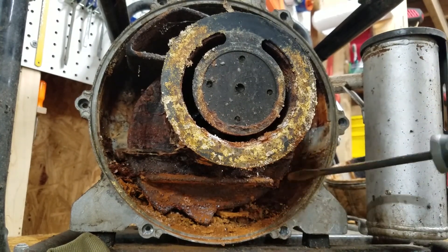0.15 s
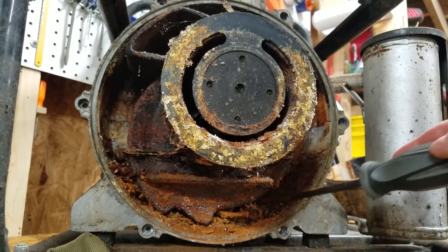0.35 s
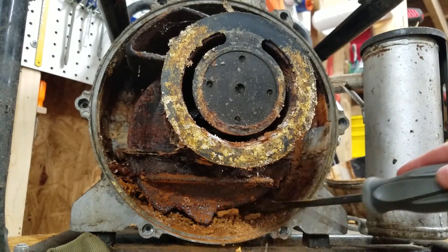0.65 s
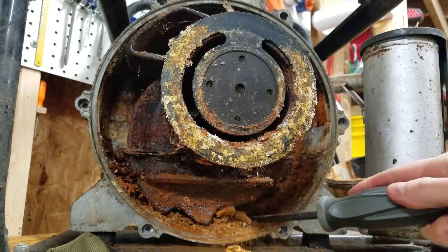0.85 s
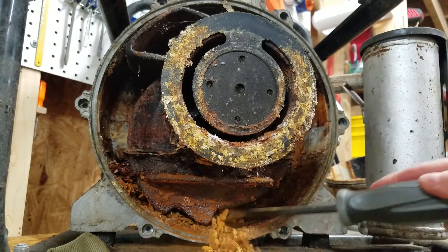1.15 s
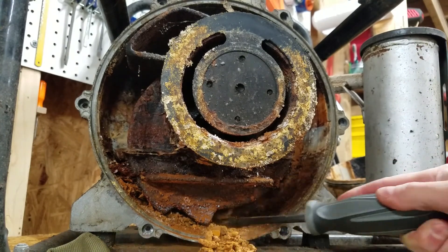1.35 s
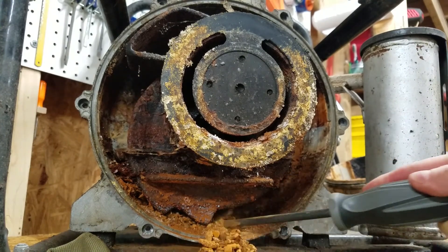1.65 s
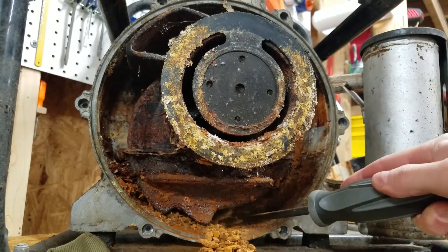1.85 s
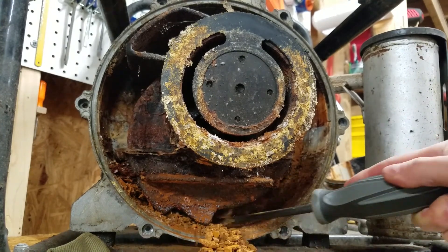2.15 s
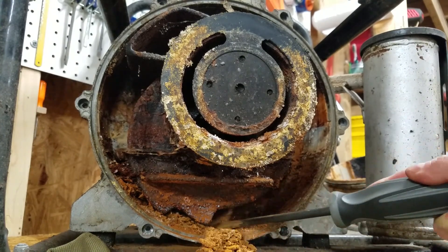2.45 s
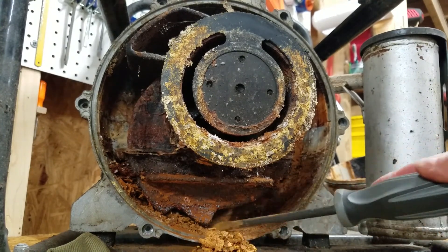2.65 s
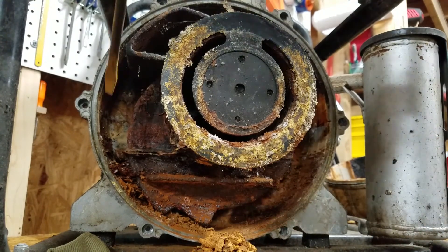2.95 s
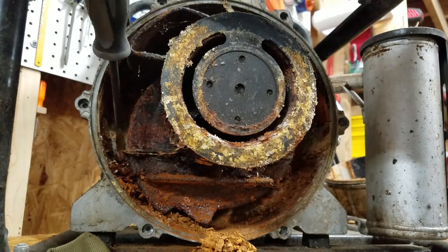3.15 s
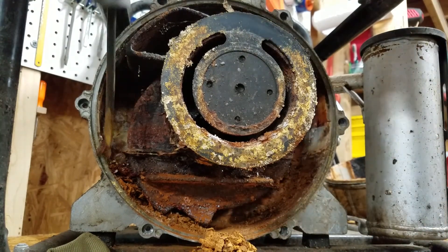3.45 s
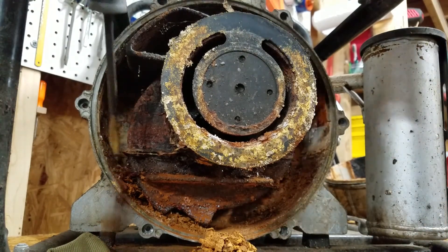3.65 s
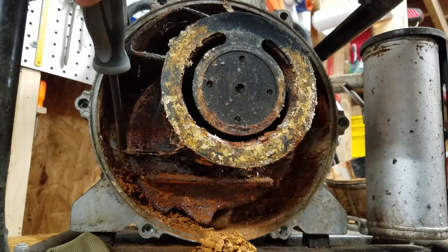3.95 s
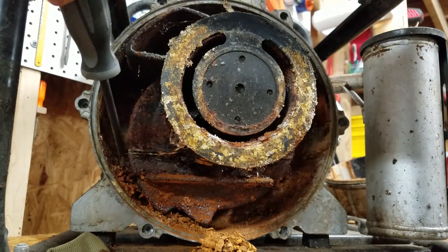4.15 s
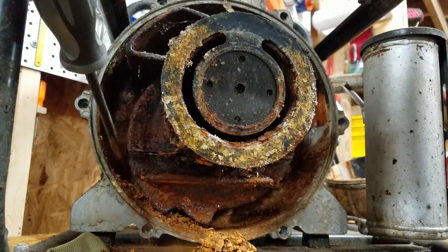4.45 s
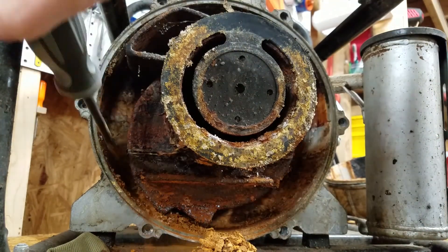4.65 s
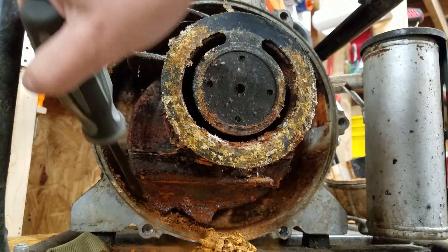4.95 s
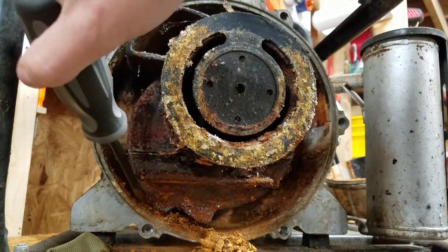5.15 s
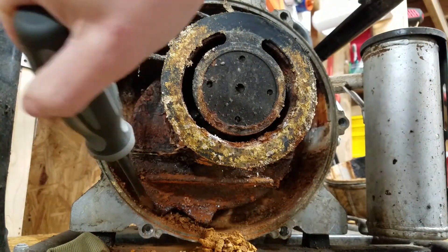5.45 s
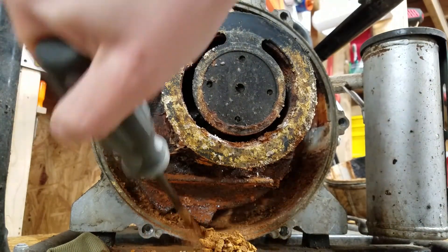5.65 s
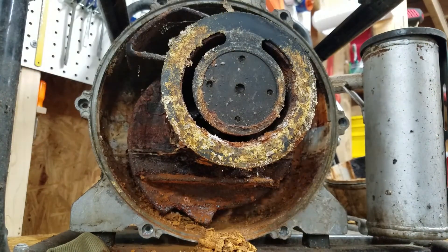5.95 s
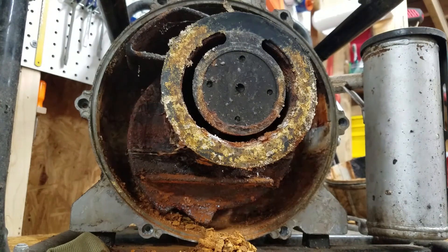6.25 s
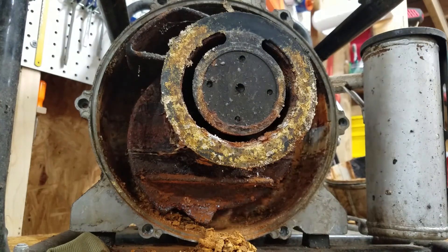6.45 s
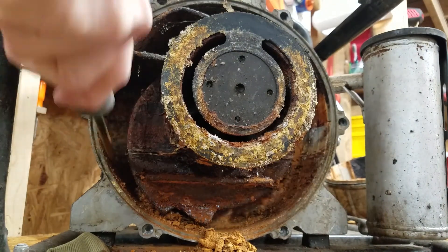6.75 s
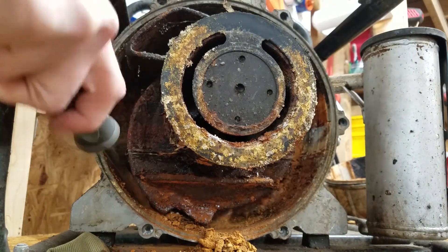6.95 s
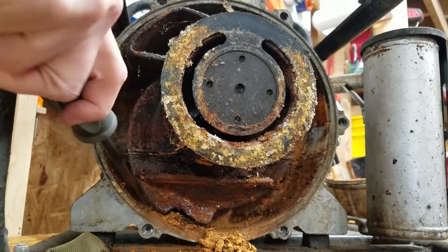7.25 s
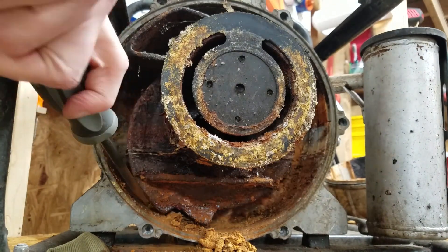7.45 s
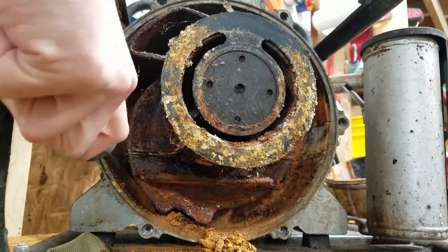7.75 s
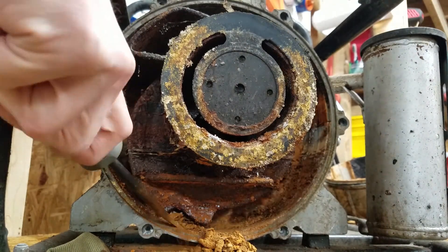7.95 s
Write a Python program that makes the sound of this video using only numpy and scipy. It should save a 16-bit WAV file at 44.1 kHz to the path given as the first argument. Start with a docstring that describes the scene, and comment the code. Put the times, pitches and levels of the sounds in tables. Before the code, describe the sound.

Close, bright metallic clinks and short crumbly scrapes of a tool in a rusty pump housing, with a few hollow knocks after six seconds.

```python
"""A screwdriver chips and scrapes rust out of an open cast-metal pump housing, close to a phone in a small workshop.
Faint steady hiss and a low rumble lie underneath from the start, where a soft thump and two hollow knocks come first.
From 0.2 s jabs ring the housing near 2.9 kHz, hardest in the first three seconds; between them the tip is dragged:
dense tiny slips ring the housing too, rasp the shaft and crush flakes. Around 6 s the scraping pauses and thumps and
knocks come as the tool is moved about; then strokes and a few jabs go on to the end. Noise and decaying tones make it."""
import sys
import numpy as np
from scipy import signal
from scipy.fft import rfft, irfft, next_fast_len
from scipy.io import wavfile

SR = 44100
rng = np.random.default_rng(int(sys.argv[2]) if len(sys.argv) > 2 else 0)


def unload_wav(signal):
    """Save mono or channel-first audio to the path in sys.argv[1] as 16-bit WAV at rate SR, clipped to [-1, 1]."""
    wavfile.write(
        sys.argv[1],
        SR,
        np.round(np.clip(np.atleast_2d(signal).T, -1, 1) * 32767).astype(np.int16),
    )


N = 357651  # samples in the scene
RESPONSE = 13230  # samples in one ring or burst (0.3 s)
AGE = np.arange(RESPONSE) / SR  # seconds since contact


def undb(db):
    """Turn decibels into gain."""
    return 10 ** (np.asarray(db) / 20)


def level(x, db):
    """Scale to an rms level in dB."""
    return x * undb(db) / np.sqrt(np.mean(x ** 2) + 1e-20)


def unit(x):
    """Scale to unit energy."""
    return x / np.sqrt(np.sum(x ** 2) + 1e-20)


def add(out, start_s, x):
    """Mix a sound in at a time, cutting what runs past the end."""
    i = max(int(start_s * SR), 0)
    out[i:i + len(x)] += x[:max(N - i, 0)]


def conv(x, response):
    """Filter by an impulse response, keeping the length."""
    return signal.fftconvolve(x, response)[:len(x)]


def fade(t60):
    """Die away exponentially, by 60 dB in t60 seconds."""
    return np.exp(-np.log(1000) * AGE / t60)


def spectrum_gain(points, size):
    """Draw a smooth gain curve through (pitch_hz, level_db) points, on a log pitch scale."""
    pitch_hz, level_db = np.transpose(points)
    bins = np.maximum(np.fft.rfftfreq(size, 1 / SR), 1)
    return undb(np.interp(np.log(bins), np.log(pitch_hz), level_db))


def colour(points, size=2048):
    """Make a short filter with the given spectrum, with its energy as early as possible (minimum phase)."""
    cepstrum = irfft(np.log(spectrum_gain(points, size)))
    # fold the backward half of the cepstrum onto the forward half
    cepstrum[1:size // 2] *= 2
    cepstrum[size // 2 + 1:] = 0
    return irfft(np.exp(rfft(cepstrum)))


def band(x, lo_hz, hi_hz, order=1):
    """Keep the pitches between two limits (Butterworth band-pass)."""
    limits = [max(lo_hz, 20), min(hi_hz, SR / 2 - 1)]
    return signal.sosfilt(signal.butter(order, limits, "band", fs=SR, output="sos"), x)


def ring(modes, scatter_db, detune):
    """Sum decaying tones; each contact changes their levels and pitches a little at random."""
    chance = rng.standard_normal((len(modes), 2))
    total = np.zeros(RESPONSE)
    for (pitch_hz, level_db, t60), (loudness, bend) in zip(modes, chance):
        tone = np.sin(2 * np.pi * pitch_hz * (1 + detune * bend) * AGE)
        total += undb(level_db + scatter_db * loudness) * fade(t60) * tone
    return total


def burst(response, t60, tail_db, tail_t60):
    """A short crunch of noise with a weaker or longer tail, in a given colour."""
    envelope = fade(t60) + undb(tail_db) * fade(tail_t60)
    return unit(conv(rng.standard_normal(RESPONSE) * envelope, response))


# shape of the hiss and of the rumble: pitch_hz, level_db (relative)
HISS_COLOUR = [(200, -18.5), (600, -6.5), (1000, -3.5), (1500, -0.5), (2200, -6), (4000, -9.5),
               (5500, -9.5), (8000, -6), (10200, -12), (15900, -10)]
RUMBLE_COLOUR = [(25, -13), (50, -9.5), (100, -8.5), (160, -3.5), (300, 2.5), (450, -1), (700, -4),
                 (1200, -21.5)]
# how the rumble comes and goes: time_s, gain_db
RUMBLE_SWELL = [(0, -60), (.3, -68), (.7, -74), (.95, -56.5), (2.8, -59.5), (4.498, -57.5), (6.15, -58.5),
                (6.4, -68), (7.0, -70), (7.75, -72.5), (7.9, -57), (8.11, -61)]
HISS_DB = -66  # rms


def floor():
    """Steady noise hiss, brighter in the left port, and low noise rumble that comes and goes, partly shared."""
    noise = rng.standard_normal((7, N))
    hiss = [level(conv(noise[k] + 0.09 * noise[2], colour(HISS_COLOUR)), HISS_DB) for k in (0, 1)]
    hiss[0] = hiss[0] + level(band(noise[3], 11400, 13400, order=2), -69.5)
    # the swell is applied on top of this rms level
    rumble = [level(conv(noise[4] + .7 * own, colour(RUMBLE_COLOUR)), -10.5) for own in noise[5:]]
    swell = undb(np.interp(np.arange(N) / SR, *np.transpose(RUMBLE_SWELL)))
    return np.array(hiss) + swell * np.array(rumble)


# soft thumps on the housing: start_s, level_db (peak before the gain of each port)
THUMPS = [(.005, -59.5), (4.274, -58), (6.162, -38.5), (6.186, -40)]
# tones in a thump: pitch_hz, level_db (relative), t60_s
THUMP_MODES = [(75, -25, .27), (140, -25, .2), (305, 0, .19), (302, -24, .7), (393, -19, .12),
               (554, -19, .16)]
THUMP_ATTACK_S = 0.0081  # a soft bump builds up over a few cycles


def thumps():
    """Soft bumps wake only the lowest tones of the housing, with a gentle start."""
    out = np.zeros(N)
    for start_s, level_db in THUMPS:
        boom = ring(THUMP_MODES, scatter_db=1.5, detune=0.0033)
        boom = boom * (1 - np.exp(-AGE / THUMP_ATTACK_S))
        add(out, start_s, boom * undb(level_db) / np.abs(boom).max())
    return out


# hollow knocks: start_s, level_db (the hollow part peaks 1.5 dB higher),
# treble_db (clack against the hollow part, before a 7.5 dB lift)
KNOCKS = [(.044, -50, -9), (0.125, -54, -8), (3.596, -44.5, -3), (4.746, -44.5, -21), (5.85, -57, -9),
          (5.932, -58, -13), (6.021, -54.5, -7), (6.04, -51.5, -14), (6.15, -45, -16.5),
          (6.168, -39.5, -13.5), (6.204, -41.5, -18), (6.581, -41.5, -8), (6.625, -22.5, -11),
          (6.646, -36.5, 0), (6.872, -33.5, -9), (7.602, -39.5, -9.5), (7.725, -42.5, -8.5)]
# tones of the hollow body: pitch_hz, level_db (relative, before a band-pass), t60_s
HOLLOW_MODES = [(429, 1, 0.33), (871, 3, .13), (1100, -3.5, 0.088), (1143, -10, 0.18), (1327, 7, .07),
                (1390, 6.5, 0.032), (1670, -8, 0.11), (1940, -20, 0.054)]
# how much the hollow body rings, by knock strength; the hardest rings most:
# level_db (as in the knocks), ring_db (against the clunk)
KNOCK_RING = [(-41, -1), (-36.5, -5), (-22.5, 8.5)]
# shape of the hard clack and of the dull clunk: pitch_hz, level_db (relative)
CLACK_COLOUR = [(200, -49), (1500, -66), (2300, 0.5), (2850, 23), (3500, 16), (4200, 12.5), (5100, 7.5),
                (6100, 13.5), (7600, 2.5), (9000, -4), (11300, -7), (16000, -25)]
CLUNK_COLOUR = [(60, -19), (250, -18), (470, -0.5), (650, -9), (900, 2), (1200, -8), (1600, 6), (2100, 0),
                (3000, -11.5), (6000, -18)]


def knocks():
    """A dull noise clunk with a hard clack on top; the hollow body's tones ring along, most in a firm knock."""
    out, clack, clunk = np.zeros(N), colour(CLACK_COLOUR), colour(CLUNK_COLOUR)
    for start_s, level_db, treble_db in KNOCKS:
        ring_db = np.interp(level_db, *np.transpose(KNOCK_RING))
        # one click plus a rough tail of noise sets the tones going
        rough = unit(rng.standard_normal(RESPONSE) * fade(0.063))
        contact = unit(signal.unit_impulse(RESPONSE) + 0.62 * rough)
        tones = conv(ring(HOLLOW_MODES, scatter_db=0.5, detune=0.0019), contact)
        tones = unit(band(tones, 940, 1430, order=2))
        thud = burst(clunk, t60=0.053, tail_db=-4, tail_t60=0.15)
        hollow = unit(thud + undb(ring_db) * tones)
        treble = burst(clack, t60=0.043, tail_db=-15.5, tail_t60=0.22)
        hit = hollow + undb(treble_db + 7.5) * treble
        add(out, start_s, hit * undb(level_db + 1.5) / np.abs(hollow).max())
    return out


# tones of the housing wall, before shift and band-pass: pitch_hz, level_db (relative), t60_s
HOUSING_MODES = [(2458, -12, .053), (2830, -3.5, 0.085), (2909, 6.5, 0.021), (2944, 1, .027),
                 (3160, -6, .023), (3108, -10, 0.0075), (3420, -9.5, 0.043), (3780, -5, 0.03),
                 (4105, -13.5, 0.038), (4430, -20, 0.028)]
CONTACT_SHIFT = .014  # typical pitch shift from one point of contact to another, as a share of the pitch


def housing():
    """The wall's ring: decaying tones that shift with the point of contact, with a random upper limit."""
    reach_hz = 3900 + 650 * rng.uniform(-1, 1)
    shift = 1 + CONTACT_SHIFT * rng.standard_normal()
    modes = [(pitch_hz * shift, level_db, t60) for pitch_hz, level_db, t60 in HOUSING_MODES]
    return unit(band(ring(modes, scatter_db=2.6, detune=.008), 2650 * shift, reach_hz, order=2))


# the shaft's resonance follows the grip and the angle of the tip: time_s, centre_hz, width_hz (first filter)
SHAFT_RESONANCE = [(0, 5560, 4040), (1.9, 8930, 3620), (2.3, 8500, 1830), (2.65, 7640, 1710),
                   (3.1, 6720, 900), (5.65, 6440, 549), (6.7, 7400, 3500)]


def shaft(time_s):
    """The hand-damped resonance of the screwdriver at this moment: a click through two band-passes."""
    times, centres, widths = np.transpose(SHAFT_RESONANCE)
    centre_hz = np.interp(time_s, times, centres)
    width_hz = np.interp(time_s, times, widths)
    peak = band(signal.unit_impulse(RESPONSE), centre_hz - width_hz / 2, centre_hz + width_hz / 2)
    return unit(band(peak, centre_hz - 1.4 * width_hz, centre_hz + 0.396 * width_hz))


# in the first second the hollow sounds thin, without its lows; later they fill in:
# time_s, lowest_hz, gain_db
HOLLOW_LOWS = [(.3, 1400, 9), (.8, 950, 1), (1.3, 355, 1), (1.9, 300, 0.5), (3.1, 250, -3.5)]
# the more crust a jab breaks, the more the hollow behind the wall answers:
# crack of a clean jab (dB), its hollow body (dB), rise (dB per dB of crack), where the rise stops (dB of crack)
CLEAN_CRACK_DB, BODY_DB, BODY_SLOPE, BODY_RANGE_DB = -29, -23.5, 0.47, 12.5


def jab(start_s, level_db, crack_db, crack, body):
    """One jab cracks the crust in a noise burst, and rings the wall, the shaft and the hollow behind."""
    snap = burst(crack, t60=0.0095, tail_db=-12.0, tail_t60=0.11)
    rasp = burst(shaft(start_s), t60=0.0094, tail_db=-19.5, tail_t60=0.07)
    # with the tool held upright against the left wall, the shaft speaks more than the crust
    shaft_db = np.interp(start_s, [1.9, 3.2, 5.7, 6.2], [-4, 2, 17.0, 1.5])
    bright = unit(snap + undb(shaft_db) * rasp)
    times, lows, gains = np.transpose(HOLLOW_LOWS)
    hollow = burst(body, t60=0.022, tail_db=5.5, tail_t60=0.077)
    hollow = band(hollow, np.interp(start_s, times, lows), 6025, order=2)
    hollow = undb(np.interp(start_s, times, gains)) * hollow
    body_db = BODY_DB + BODY_SLOPE * min(crack_db - CLEAN_CRACK_DB, BODY_RANGE_DB)
    hit = housing() + undb(crack_db + 11.0) * bright + undb(body_db) * hollow
    return hit * undb(level_db + 4.5) / np.abs(hit).max()


# the tip strikes the wall or snaps a flake: start_s, level_db (peaks 4.5 dB higher),
# crack_db (bright crack against the wall's ring, before an 11 dB lift)
TAPS = [(0.2042, -27, -14), (0.2831, -29, -15), (.6651, -22, -15), (.8258, -19, -21), (0.9679, -12, -29),
        (1.167, -31.5, 14), (1.2006, -15.5, -28.5), (1.215, -14.5, -29.5), (1.2203, -21, -38),
        (1.2347, -28, 2.5), (1.321, -11.5, -25), (1.3503, -25, -21.5), (1.469, -13, -24),
        (1.6205, -14.5, -22.5), (1.644, -29.5, -14), (1.703, -33.5, 11), (1.718, -11, -19.5),
        (1.731, -17.5, -25), (1.777, -23, -16), (1.8254, -17.5, -35), (1.8469, -19.5, -26),
        (1.94, -19, -34), (1.956, -29, -19), (2.161, -25.5, -23), (2.1794, -26, -16.5), (2.28, -21, -17.5),
        (2.45, -24.5, -44), (2.473, -28, -24), (2.5423, -30.5, -25), (2.6431, -23.5, -29),
        (3.0557, -10, -24), (3.1128, -34, -2), (3.142, -31, -31), (3.3784, -25, -24), (3.4035, -28, -38),
        (3.456, -30, -19), (3.5315, -39.5, -20), (3.5596, -37.5, 8), (3.7286, -42, 14), (3.856, -41.5, 4),
        (4.1022, -35.5, -11), (4.268, -36.5, -6), (4.674, -48, -25), (4.7444, -37.5, -8),
        (4.9717, -43, -30), (5.076, -34.5, 16), (5.1488, -26.5, -22.5), (5.3023, -36.5, 1),
        (5.364, -38, -19), (5.464, -34, 10), (5.5048, -30.5, -3.5), (5.5888, -40.5, 1),
        (5.6346, -36.5, -25), (6.2034, -28.5, 11), (6.49, -42, 5), (6.8385, -35.5, -18),
        (7.382, -33.5, -19), (7.4928, -38.5, -22), (7.8067, -39, -18), (7.905, -30.5, -30)]
# shape of the crust's crack and of the hollow behind the wall: pitch_hz, level_db (relative)
CRACK_COLOUR = [(200, -55.5), (2200, -14), (3500, -2.5), (4300, 4.5), (5200, 1), (7000, -10), (8000, 1.5),
                (10500, -3), (12200, -2), (14000, -10.5), (15500, -2)]
BODY_COLOUR = [(60, -40.5), (200, -19.5), (400, -6.5), (560, -5.5), (700, -9.5), (1000, -3), (1350, -1.5),
               (1620, 4), (1950, -0.5), (2500, -13.5), (3500, -39.5)]
# each stroke breaks one flake loose: its level above the stroke's grit_db, and its crack_db, as in the taps
FLAKE_DB, FLAKE_CRACK_DB = 17, -1


def taps():
    """The jabs, and the flake that snaps off at a random point along each stroke, struck in the same way."""
    out, crack, body = np.zeros(N), colour(CRACK_COLOUR), colour(BODY_COLOUR)
    flakes = [(rng.uniform(start_s, end_s), grit_db + FLAKE_DB, FLAKE_CRACK_DB)
              for start_s, end_s, grit_db, _ in STROKES]
    for start_s, level_db, crack_db in TAPS + flakes:
        add(out, start_s, jab(start_s, level_db, crack_db, crack, body))
    return out


def slips(length, rate, spread_db, catch_rate, catch_db):
    """Tiny fractures of very unequal size; the tip catches and frees itself, so they come in clusters."""
    size = int(length * SR)
    t = np.arange(size) / SR
    chance = rng.random((RESPONSE, 2))[:size].T
    catches = np.interp(t * catch_rate, np.arange(256), rng.standard_normal(256))
    unequal = np.minimum(-np.log(1 - chance[1]), 4)
    sizes = undb(spread_db * unequal + catch_db * catches)
    swell = np.sin(np.pi * t / length) ** 0.2
    signs = rng.choice([-1, 1], RESPONSE)[:size]
    return (chance[0] < rate / SR) * sizes * swell * signs


# the tip is dragged: start_s, end_s, grit_db (before a 3.5 dB lift), ring_db (the housing's ring)
STROKES = [(0.204, 0.249, -58, -50), (0.281, 0.426, -64, -49.5), (.426, 0.496, -59.5, -52),
           (0.545, 0.606, -67.5, -65.5), (0.678, 0.761, -60.5, -47.5), (0.843, 0.902, -64, -52),
           (1.089, 1.154, -67, -60.5), (1.231, 1.289, -61.5, -54), (1.343, 1.43, -59.5, -54),
           (1.486, 1.57, -66.5, -55.5), (1.866, 1.892, -64, -55), (1.932, 1.975, -54.5, -41),
           (2.056, 2.137, -61, -49), (2.186, 2.226, -58.5, -45), (2.246, 2.319, -61.5, -44.5),
           (2.366, 2.401, -53.5, -43.5), (2.451, 2.494, -54.5, -48), (2.554, 2.58, -59, -43),
           (2.647, 2.67, -55, -41.5), (3.149, 3.205, -66, -51), (3.276, 3.326, -61, -56.5),
           (3.391, 3.472, -59, -49), (3.562, 3.662, -63, -56.5), (3.916, 3.963, -71.5, -56),
           (3.978, 4.019, -59, -55), (4.099, 4.236, -60, -53), (4.267, 4.348, -57.5, -51),
           (4.492, 4.593, -62, -56), (4.737, 4.862, -67.5, -59.5), (4.885, 4.996, -66, -64.5),
           (5.027, 5.125, -64, -58.5), (5.145, 5.166, -52.5, -72), (5.216, 5.241, -64.5, -53),
           (5.295, 5.371, -65, -72), (5.455, 5.503, -65, -58.5), (6.752, 6.863, -60, -52),
           (6.905, 6.968, -59, -51.5), (7.02, 7.096, -65.5, -55), (7.101, 7.299, -63, -59),
           (7.292, 7.41, -60.5, -50.5), (7.441, 7.575, -64.5, -54), (7.808, 7.835, -62, -48),
           (7.905, 7.927, -58, -41), (7.947, 8.061, -71, -53), (8.097, 8.103, -60, -38.5)]
# what the dragged tip meets: dry crust along the bottom, wet sludge with the tool upright at the left wall,
# dry crust again: time_s, rasp_db (shaft, relative to grit_db), sludge_db (crumbling, relative to grit_db)
CONTACT = [(.3, -0.5, -15.5), (1.45, -26, -3.5), (1.901, 2.5, -4), (2.6, 12, -6.5), (3.4, 2, -1.5),
           (4.3, 3.5, -1.5), (4.85, 6, -0.5), (5.45, 8.5, -2), (6.75, -16.5, -10), (7.4, -23, -8),
           (7.9, -7, 2.5)]
# shape of the crushed grit and of the sludge: pitch_hz, level_db (relative)
GRIT_COLOUR = [(200, -65.5), (1500, -10), (3800, -7.5), (5000, -1.5), (7500, 2), (9500, -1), (10600, -6),
               (12300, 1), (14200, -7.5), (16000, -3)]
SLUDGE_COLOUR = [(100, -17), (250, -7.5), (340, -7), (410, 7), (480, -3), (650, -4), (1000, -2),
                 (1430, -2.5), (2000, -11), (6000, -25)]
# a firm jab (level_db over FIRM_DB) skids on through the crust: delay and length, grit_db and ring_db
FIRM_DB = -15.3
SKID_DELAY_S, SKID_S, SKID_GRIT_DB, SKID_RING_DB = 0.013, 0.052, -63.5, -55.5
DRAG_BODY_DB = -20  # the hollow's answer to a dragged tip, relative to the wall's ring
PRESSED_T60_S = .03  # extra fade: a dragged tip presses on the wall and damps it


def strokes():
    """The dragged or skidding tip feeds its slips to wall, hollow and shaft, while flakes and sludge crumble."""
    out, grit, sludge = np.zeros(N), colour(GRIT_COLOUR), colour(SLUDGE_COLOUR)
    hollow = band(colour(BODY_COLOUR), 1300, 1800)
    times, rasps, sludges = np.transpose(CONTACT)
    skids = [(start_s + SKID_DELAY_S, start_s + SKID_DELAY_S + SKID_S, SKID_GRIT_DB, SKID_RING_DB)
             for start_s, level_db, _ in TAPS if level_db > FIRM_DB]
    for start_s, end_s, grit_db, ring_db in STROKES + skids:
        length = np.clip(end_s - start_s + 0.0026, .012, .25)
        coarse = unit(slips(length, rate=1600, spread_db=4.4, catch_rate=130, catch_db=5))
        dust = unit(slips(length, rate=9000, spread_db=2.0, catch_rate=87.0, catch_db=7.0))
        crunch = coarse + dust
        rasp_db = grit_db + np.interp(start_s, times, rasps)
        sludge_db = grit_db + np.interp(start_s, times, sludges)
        # what pushes, what answers, how loud (dB)
        paths = [(coarse, housing() * fade(PRESSED_T60_S), ring_db),
                 (coarse, shaft(start_s), rasp_db),
                 (crunch, hollow, ring_db + DRAG_BODY_DB),
                 (crunch, grit, grit_db + 3.5),
                 (crunch, sludge, sludge_db)]
        for force, response, db in paths:
            answer = unit(signal.fftconvolve(force, response))
            # longer strokes carry more energy, so the level is an average over the stroke
            add(out, start_s - .003, answer * np.sqrt(len(force)) * undb(db))
    return out


ROOM_T60_S = 0.091


def room(x, db):
    """Shelves and walls return a short, dense tail, made of fading noise."""
    tail = rng.standard_normal(RESPONSE) * fade(ROOM_T60_S) * (1 - np.exp(-AGE / 0.0027))
    return undb(db) * conv(x, unit(tail))


# the left port faces away from the work, but has a resonance of its own:
# pitch_hz, level_db (relative to the right port)
SHADOW = [(100, -1), (400, -2), (1300, -4), (2000, -9), (2800, -15), (5000, -15), (6500, -19), (9000, -19),
          (10300, -15), (11700, -4), (13000, -8), (16000, -12)]
PORT_LAG = 4  # samples


def far_port(x):
    """The way round the phone's body shades the sound and delays it by a few samples."""
    size = next_fast_len(N + RESPONSE, real=True)
    bins = np.maximum(np.fft.rfftfreq(size, 1 / SR), 1)
    delay = np.exp(-2j * np.pi * bins * PORT_LAG / SR)
    return irfft(rfft(x, size) * spectrum_gain(SHADOW, size) * delay, size)[:N]


def scene():
    """The work is close to the right port; the thumps come through the bench, mostly to the left one."""
    work = taps() + strokes() + knocks()
    boom = thumps()
    left = far_port(work + room(work, db=-9.0)) + undb(4.5) * boom
    right = work + room(work, db=-13) + undb(-13) * boom
    return np.array([left, right]) + floor()


TOP_HZ = 15720


def record(dry):
    """The phone cuts the top with a steep low-pass."""
    return signal.sosfilt(signal.ellip(10, .2, 70, TOP_HZ, fs=SR, output="sos"), dry)


dry = scene()
out = record(dry)
unload_wav(out)
```